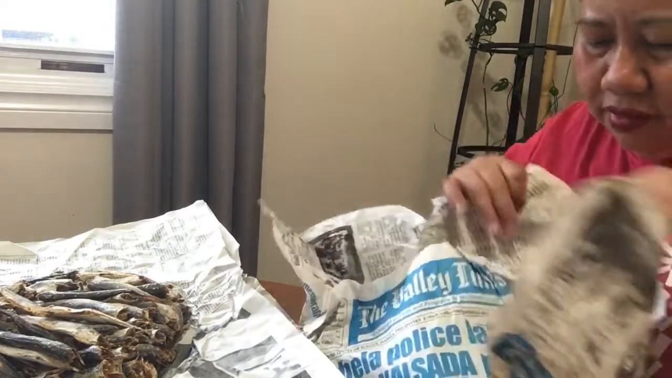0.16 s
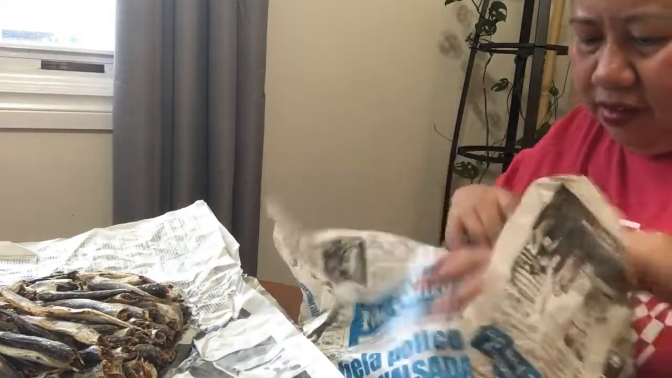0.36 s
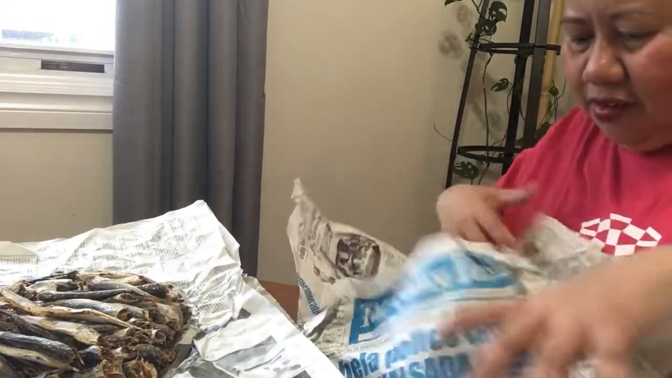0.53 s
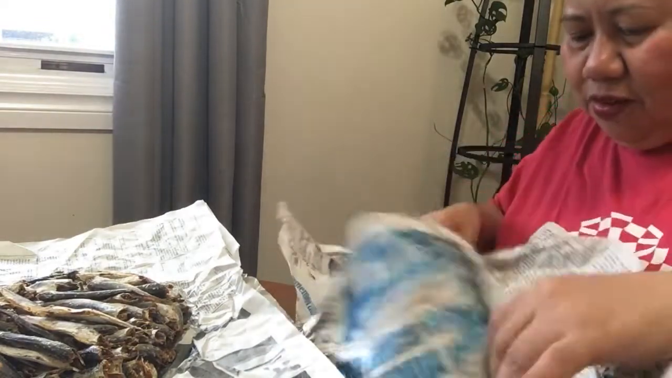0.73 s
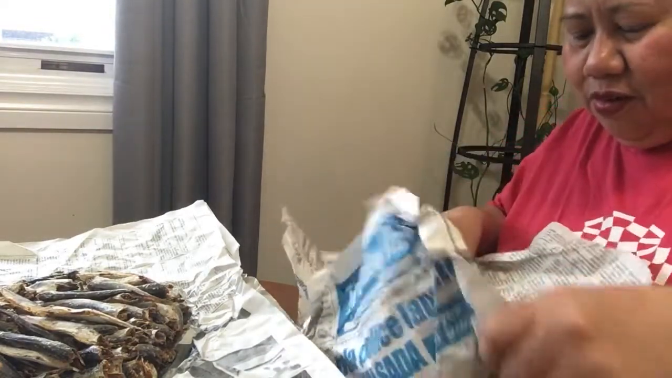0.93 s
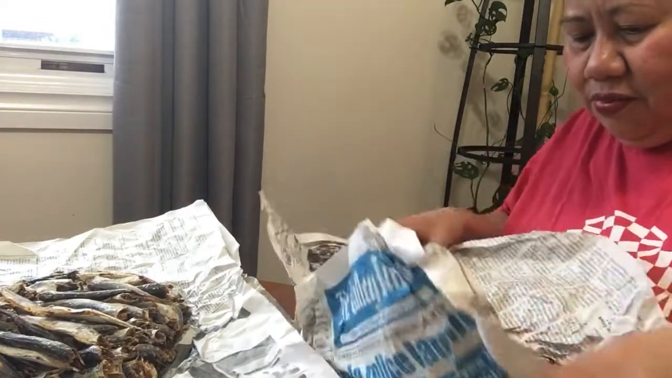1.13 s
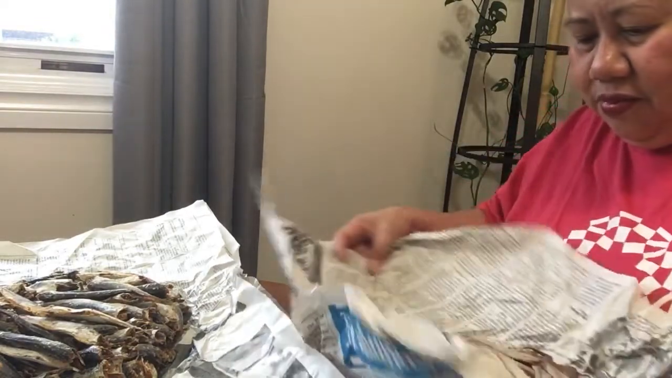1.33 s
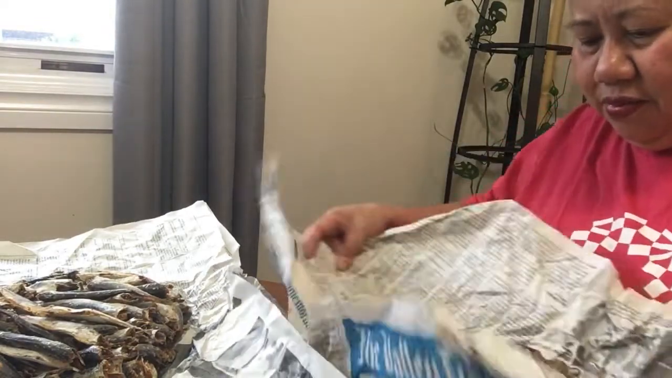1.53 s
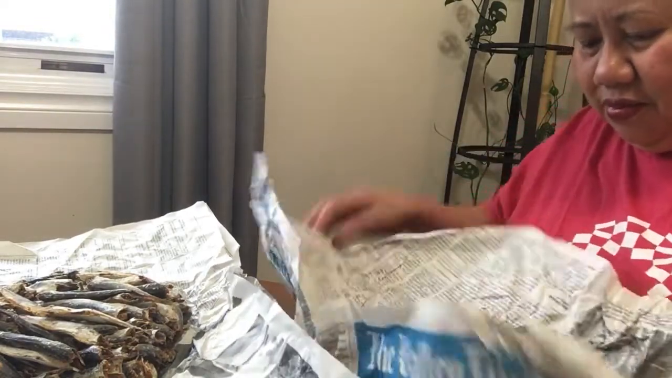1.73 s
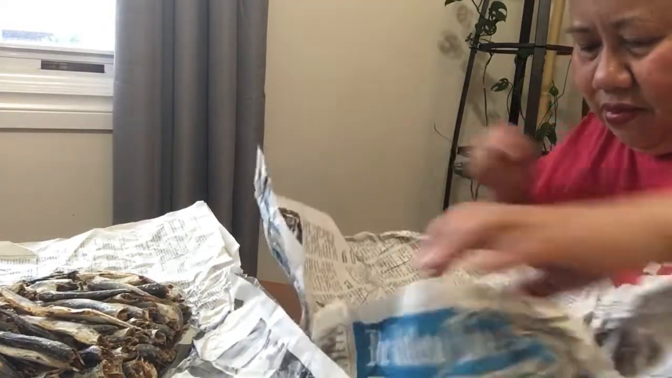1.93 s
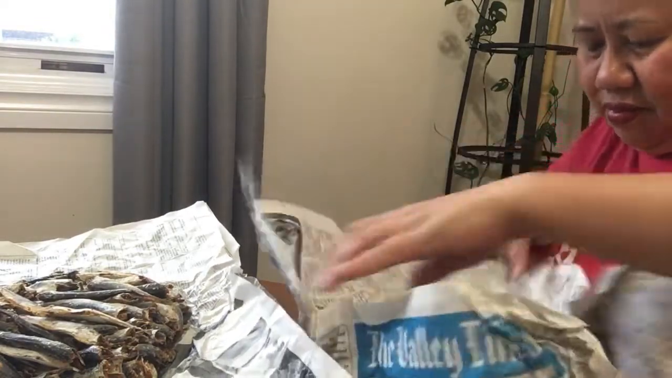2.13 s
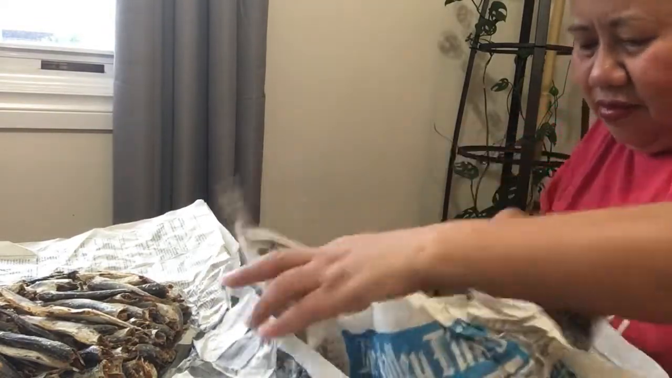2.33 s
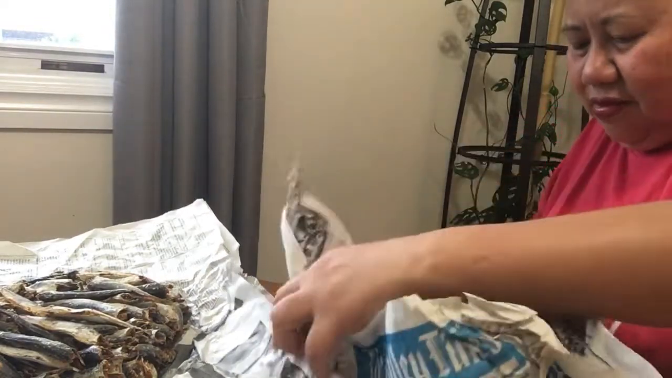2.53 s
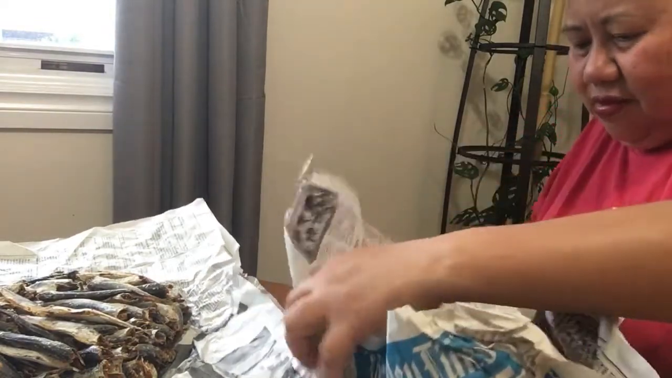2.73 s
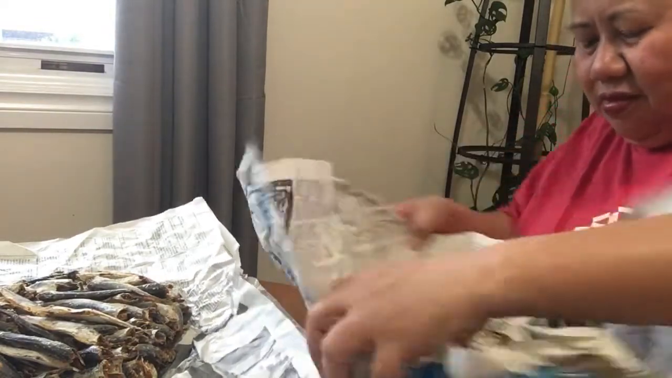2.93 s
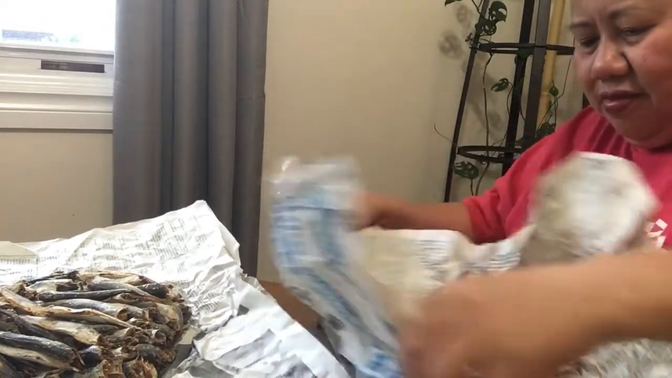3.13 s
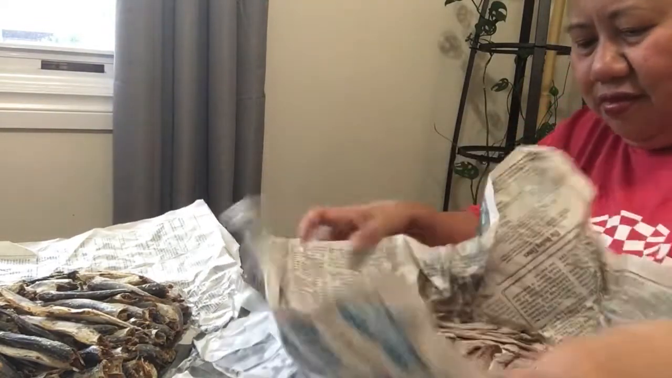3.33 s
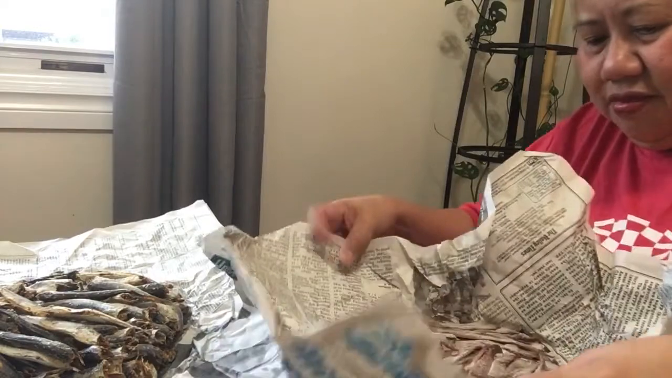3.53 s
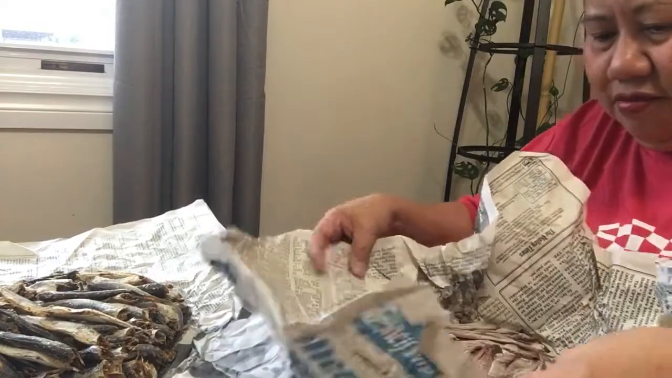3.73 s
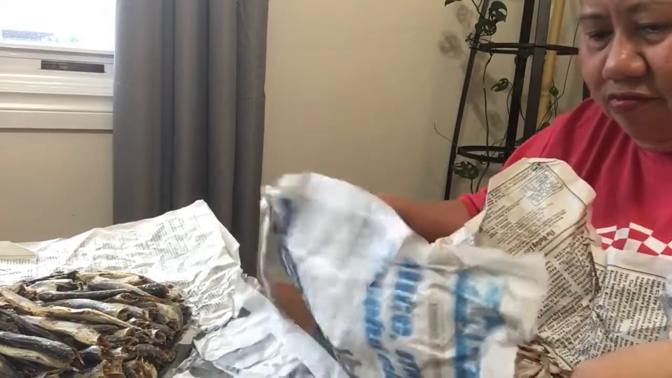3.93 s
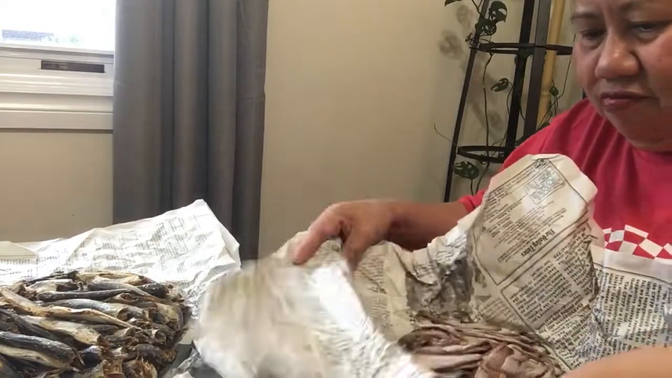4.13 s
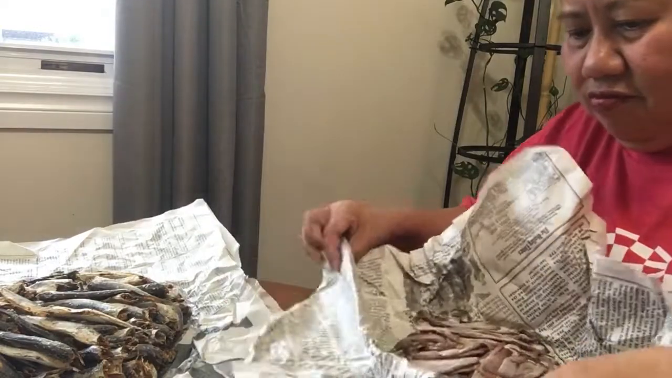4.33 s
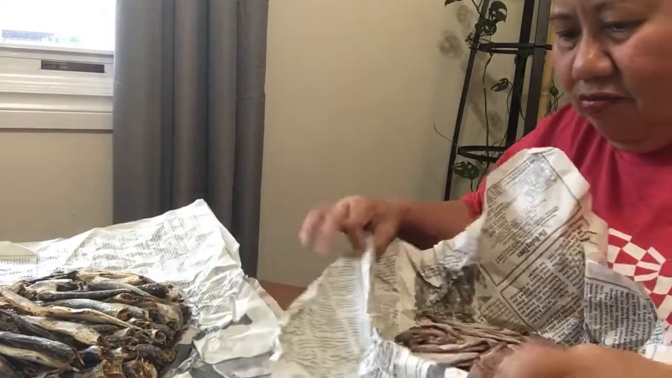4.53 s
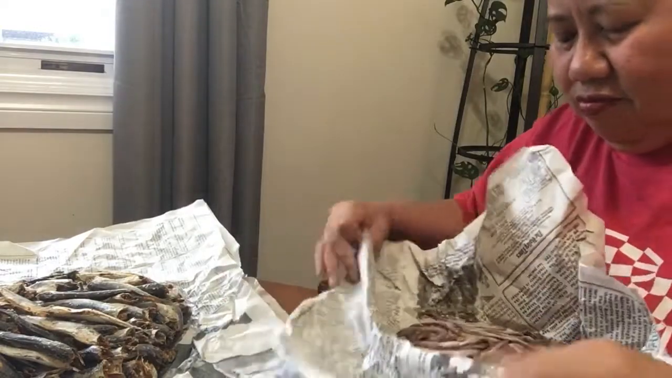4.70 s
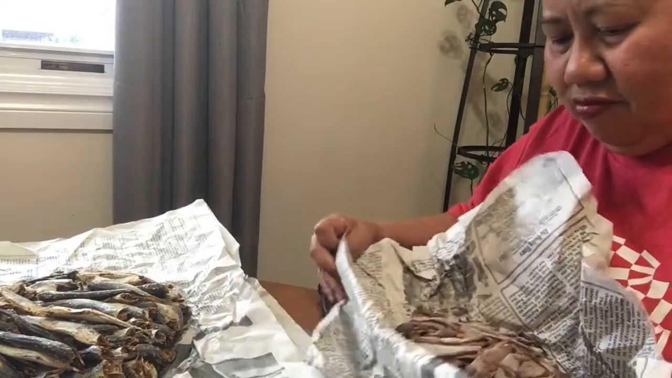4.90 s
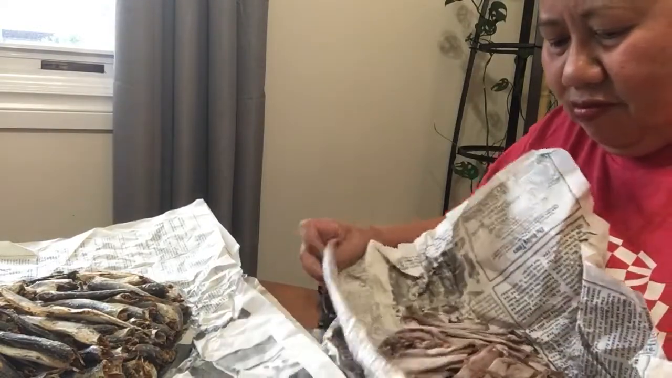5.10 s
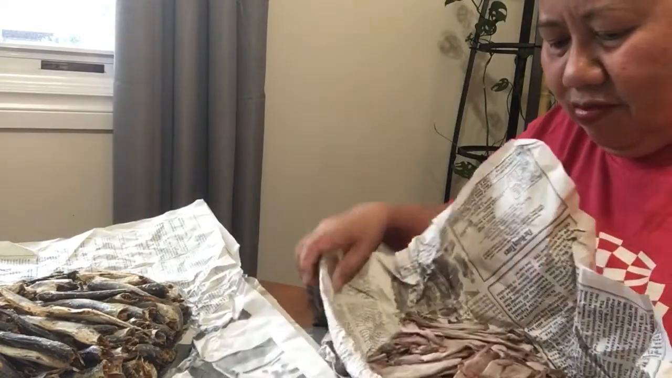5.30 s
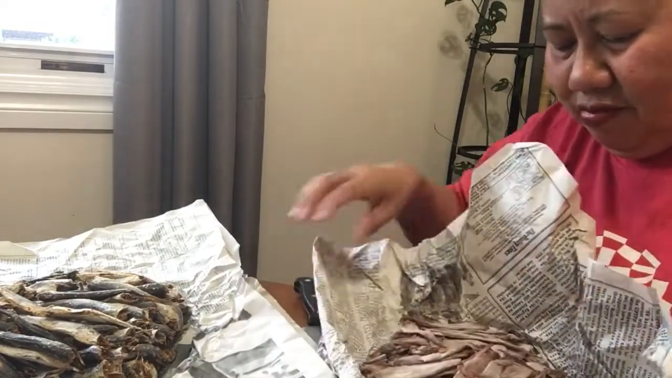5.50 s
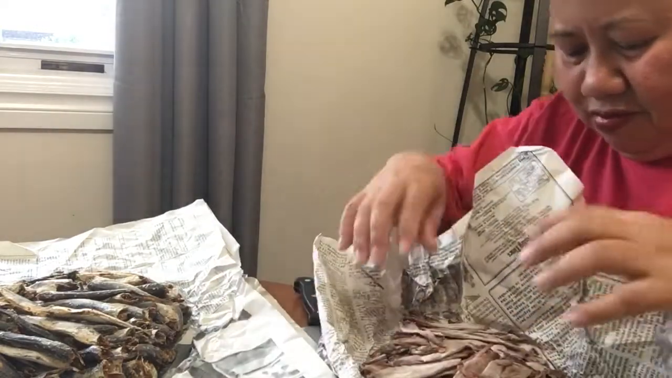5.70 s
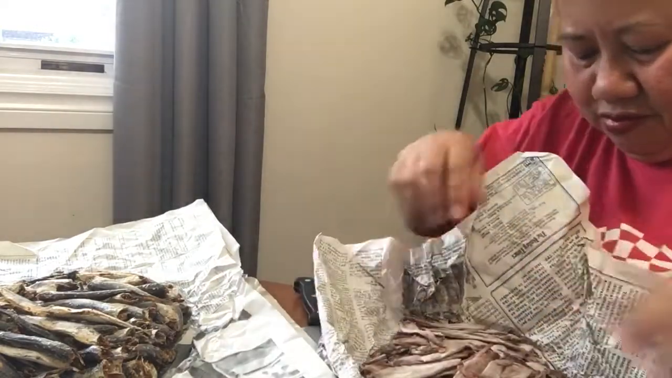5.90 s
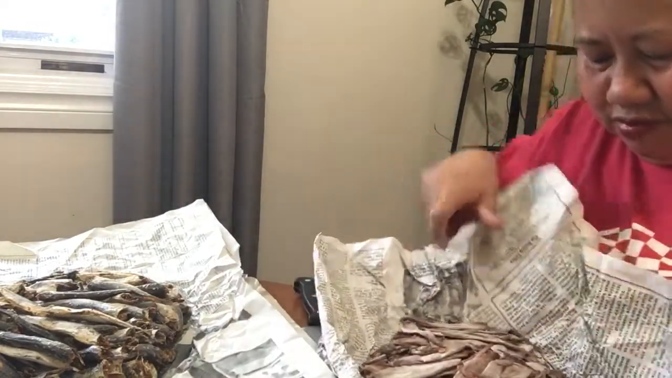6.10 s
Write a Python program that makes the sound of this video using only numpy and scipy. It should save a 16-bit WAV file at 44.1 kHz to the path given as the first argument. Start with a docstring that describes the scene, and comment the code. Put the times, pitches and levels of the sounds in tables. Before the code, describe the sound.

Dry newspaper crackles, snaps and flaps as hands unfold a bundle indoors, then a small hard object drops and rattles on a wooden table.

```python
"""Paper crackles and slides softly, and sharp creases snap one by one as hands unfold a newspaper bundle.
Crackle is many tiny ringing grains over hissing noise; each snap is a short ring with bursts of noise.
Large panels flap and pop low: deep lumpy noise and short dying waves, over faint room noise and a hum.
Near the end a small hard object drops on the wooden table and bounces: dying tones, ticks and a rattle.
A small quiet room adds a short echo to the snaps and bounces."""
import sys
import numpy as np
from scipy import signal
from scipy.fft import rfft, irfft
from scipy.io import wavfile
from scipy.ndimage import uniform_filter1d

SR = 44100
rng = np.random.default_rng(int(sys.argv[2]) if len(sys.argv) > 2 else 0)


def store_pcm(level_fs):
    """Save levels as 16-bit WAV."""
    pcm = np.round(np.clip(level_fs, -1, 1) * 32767).astype(np.int16)
    wavfile.write(sys.argv[1], SR, np.atleast_2d(pcm).T)


N = 271215

# How strongly the hands work the paper: start_s, level_db (of the rustle)
HANDLING = [(0, -47), (.2, -55.5), (.4, -41.5), (.49, -47.5), (.66, -37.5), (.88, -39), (.97, -45.5),
            (1.05, -41), (1.12, -45.5), (1.27, -34), (1.44, -37), (1.68, -39.5), (1.78, -48.5),
            (1.84, -42.5), (1.97, -49), (2.15, -45), (2.25, -38.5), (2.33, -35), (2.41, -38), (2.54, -39.5),
            (2.87, -31.5), (3.03, -38.5), (3.35, -43), (3.53, -53.5), (3.68, -55), (3.76, -45.5),
            (3.92, -38), (4.02, -41), (4.15, -35), (4.23, -40), (4.31, -33.5), (4.39, -37.5), (4.48, -34),
            (4.63, -43), (4.87, -31), (5.1, -35.5), (5.19, -35), (5.4, -51), (5.53, -60.5), (5.67, -63.5),
            (5.75, -61), (5.84, -70), (6.0, -59.5), (6.08, -59.5), (6.15, -48.5)]


def gain_of(db):
    """Turn decibels into a multiplier."""
    return 10 ** (np.asarray(db) / 20)


def evened(x):
    """Scale a sound to an average (RMS) strength of 1."""
    return x / np.sqrt(np.mean(x ** 2) + 1e-20)


def read(points, hz):
    """Read a curve of values over pitch, with pitch spaced by ratio as the ear hears it."""
    f, value = np.transpose(points)
    return np.interp(np.log(hz + 1), np.log(f + 1), value)


def along(rows, index):
    """Draw one column of a table as a curve over time, with a value at every sample."""
    columns = np.transpose(rows)
    return np.interp(np.arange(N) / SR, columns[0], columns[index])


def add(mix, s, sound):
    """Add a sound to the mix at a time in seconds, cut off at the end."""
    part = mix[round(s * SR):][:len(sound)]
    part += sound[:len(part)]


def coloured(x, points):
    """Filter a sound to a given spectrum without any sound before its cause (minimum phase)."""
    level_db = np.maximum(read(points, np.fft.rfftfreq(8192, 1 / SR)), -100)
    # Folding the cepstrum (the spectrum of the log gain) puts all the response after time zero
    cepstrum = irfft(np.log(gain_of(level_db)))
    cepstrum[1:4096] *= 2
    cepstrum[4097:] = 0
    response = irfft(np.exp(rfft(cepstrum)))[:4096]
    return signal.oaconvolve(x, response)[:len(x)]


def band(x, lo_hz, hi_hz):
    """Keep mainly the part of a sound between two pitches."""
    edges_hz = [lo_hz, min(hi_hz, .45 * SR)]
    return signal.sosfilt(signal.butter(2, edges_hz, "bandpass", fs=SR, output="sos"), x)


def coloured_burst(x, lo_hz, hi_hz):
    """Filter a short puff of noise twice to one band and scale its peak to 1."""
    y = band(band(x, lo_hz, hi_hz), lo_hz, hi_hz)
    return y / abs(y).max()


def wander(rate_hz):
    """Make a slow random drift: noise smoothed twice, with an average strength of 1."""
    size = max(int(SR / rate_hz), 2)
    smooth = uniform_filter1d(rng.standard_normal(N), size)
    return evened(uniform_filter1d(smooth, size))


def wavelet(hz, cycles, t):
    """Make a short wave that swells over its first turn, then dies within a few cycles."""
    turns = hz * t
    swell = 1 - np.exp(-(.9 * turns) ** 2)
    return np.sin(2 * np.pi * turns) * swell * np.exp(-turns / cycles)


def air():
    """Make the steady noise of the quiet room and the wavering hum of a distant machine."""
    # Tone of the room noise: pitch_hz, level_db (per Hz, relative)
    air_spectrum = [(15, -19), (25, -17), (84, -2), (130, -6), (149, -10), (373, -13), (863, -27.5),
                    (2760, -39), (5430, -41), (7710, -30), (10400, -44), (14000, -42), (16000, -34)]
    # Hum tones: pitch_hz, width_hz, level_db (before the swell)
    hum_tones = [(74.3, 4.94, -68.5), (127.6, 6.28, -72)]
    # Slow rise and fall of the hum: start_s, change_db
    hum_swell = [(0, 4), (3.3, -3), (3.8, 7.5), (5.1, 13.5), (5.6, 6.5), (6.15, -10)]
    noise_db = -61.5
    out = gain_of(noise_db) * evened(coloured(rng.standard_normal(N), air_spectrum))
    swell_db = along(hum_swell, index=1)
    for hz, width_hz, db in hum_tones:
        turns = np.cumsum(hz + width_hz / 2 * wander(5.34)) / SR
        level = gain_of(db + swell_db + 2.6 * wander(10))
        out += np.sqrt(2) * level * np.sin(2 * np.pi * turns)
    return out


def room(x):
    """Echo a sound with sparse taps of random sign, each pitch band dying at its own speed."""
    # Echo times: pitch_hz, t60_s (time to fall by 60 dB)
    echo_times = [(200, 0.58), (1500, 0.18), (5000, 0.14), (12000, 0.44)]
    taps = np.zeros(SR // 2)
    at = np.arange(200, len(taps) - 20, 20)
    taps[at + rng.integers(0, 20, len(at))] = rng.choice([-1., 1.], len(at))
    hz, t, z = signal.stft(taps, SR, nperseg=256)
    decay = gain_of(-60 * t / read(echo_times, hz)[:, None])
    tail = signal.istft(z * decay, SR, nperseg=256)[1]
    return signal.oaconvolve(x, tail / np.linalg.norm(tail))[:N]


def bending(index, resting_db):
    """Shape a panel layer over time: it follows the handling and swells at each bend."""
    # Large panels bending: peak_s (fullest bend), flap_db, push_db (low push of air), length_s
    bends = [(0.137, -52, -53, 0.14), (0.41, -48, -49.5, 0.21), (.75, -42, -44, 0.18),
             (0.927, -40, -47, .09), (1.23, -65, -50.5, 0.18), (1.407, -40.5, -45, 0.026),
             (1.462, -57, -47, .06), (1.607, -45.5, -48, 0.12), (1.86, -55.5, -52, 0.11),
             (2.13, -51.5, -55, 0.13), (2.32, -46.5, -61, 0.14), (2.41, -46, -53, .1),
             (2.72, -45, -49, 0.082), (3.177, -52, -60, 0.16), (3.59, -63, -63, .05),
             (3.723, -54, -59, .05), (3.874, -48.5, -62, 0.27), (3.974, -50, -46, 0.05),
             (4.113, -49.5, -57, 0.26), (4.477, -43.5, -59, 0.074), (4.698, -49, -65, 0.043),
             (4.85, -49, -65, 0.063), (4.978, -39.5, -49, .1), (5.061, -38, -59, 0.036),
             (6.031, -58, -50, 0.06), (6.15, -48, -58, 0.028)]
    rise_db, fall_db = 21, 17.5  # lost one length before and after the fullest bend
    t = np.arange(N) / SR
    power = gain_of(along(HANDLING, index=1) + resting_db) ** 2
    for row in bends:
        lengths_away = (t - row[0]) / max(row[-1], .01)
        loss_db = np.maximum(fall_db * lengths_away, -rise_db * lengths_away)
        power = power + gain_of(row[index] - loss_db) ** 2
    return np.sqrt(power)


def panels():
    """Bend large sheets that push air: lumpy low noise, and a pop where a panel flips over."""
    # Tone of the flapping: pitch_hz, level_db (per Hz, relative)
    flap_spectrum = [(76, -38.5), (130, 1), (205, -3.5), (410, 2), (452, -2), (567, -1.5), (772, -8),
                     (900, -42), (1170, -5), (1980, -120)]
    # Panels flipping over: start_s, level_db (before the wave's own swell and decay), pitch_hz
    flips = [(0.218, -41, 122), (0.548, -37, 118), (0.754, -25, 497), (0.909, -25, 420), (1.145, -51, 119),
             (1.187, -31, 516), (1.39, -35, 170), (1.857, -39.5, 245), (1.918, -48, 123), (1.981, -61, 186),
             (2.052, -38, 158), (2.129, -45, 375), (2.289, -34, 385), (2.546, -34, 420), (2.922, -33, 384),
             (3.585, -37, 344), (3.666, -42, 540), (3.715, -34, 383), (3.859, -34, 299), (3.956, -32, 247),
             (4.196, -30.5, 420), (4.47, -28, 680), (4.684, -43, 331), (4.736, -34, 503)]
    flap_db, push_db = -15, -23  # between bends, relative to the rustle
    lumps = rng.standard_normal((2, N)) * gain_of(2.9 * wander(55))
    flap = evened(coloured(lumps[0], flap_spectrum))
    push = evened(band(band(lumps[1], 45, 165), 45, 165))
    out = bending(index=1, resting_db=flap_db) * flap
    out += bending(index=2, resting_db=push_db) * push
    t = np.arange(4000) / SR
    for s, db, hz in flips:
        add(out, s, gain_of(db) * wavelet(hz, 1.93, t))
    return out


def landings():
    """List the landings (start_s, object_db, table_db): each flight is a fixed share of the last."""
    first_s, first_flight_s, flight_share, bounce_count = 5.223, .095, .7, 7
    rows, s = [(first_s, -40, -25)], first_s  # it first lands flat, with a thud
    for k in range(bounce_count):
        flight_s = first_flight_s * flight_share ** k
        s += flight_s
        object_db = -19.5 - 5 * k
        table_db = -35 - 4 * k
        rows.append((s, object_db, table_db))
        # The object's far end lands a little later and softer
        rows.append((s + .15 * flight_s, object_db - 9, table_db - 5))
    return rows


def ringing(modes, t, swell_turns):
    """Sum dying tones that each need some turns to build up, so the bass speaks late."""
    out = np.zeros(len(t))
    for hz, db, t60_s in modes:
        swell = 1 - np.exp(-(hz * t / swell_turns) ** 2)
        out += gain_of(db - 60 * t / t60_s) * swell * np.sin(2 * np.pi * hz * t)
    return out


def bounces():
    """Land the object again and again: each blow ticks, rings the object and rattles the table top."""
    # Tones of the object, then of the table: pitch_hz, level_db (relative to the blow), t60_s
    object_modes = [(1270, -1.5, 0.018), (1573, -4.5, 0.048), (1620, -21, 0.08), (2030, -9, 0.027),
                    (2690, -7.5, 0.038), (2860, -18, 0.094), (3700, -9.5, 0.023)]
    table_modes = [(85, -12, .3), (221, -4, .12), (270, -7, .09), (323, -3, .12), (420, -5, .09),
                   (490, -7, .09), (554, -1, .13), (640, -5, .09), (760, -7, .07), (900, 4, .035),
                   (991, -6, .06)]
    out, t = np.zeros(N), np.arange(SR // 2) / SR
    short_t = t[:3000]
    object_ring = ringing(object_modes, t, 1.0)
    table_ring = ringing(table_modes, t, 1.8)
    blows = landings()
    noise = rng.standard_normal((len(blows), 2, 3000))
    for (s, object_db, table_db), (tick_noise, rattle_noise) in zip(blows, noise):
        tick = coloured_burst(tick_noise * np.exp(-short_t / 0.0021), 480, 5300)
        add(out, s, gain_of(object_db - 1) * tick)
        add(out, s, gain_of(object_db) * object_ring)
        rattle = .04 * rattle_noise * np.exp(-short_t / .016)
        rattle[0] = 1  # the blow itself
        add(out, s, gain_of(table_db) * signal.oaconvolve(table_ring, rattle))
    return out


def tilted(x):
    """Raise and lower the body and treble of the paper sound as the handling changes."""
    # Colour of the rustle: start_s, treble_db, body_db (against the plain paper sound)
    colour = [(0, 1, -1), (.2, -2.5, 2.5), (.45, 5, 0.5), (1.05, 2, -2.5), (1.6, -1, -0.5), (2.1, -1, 2),
              (2.9, 1, 0.5), (3.15, 3, -4), (3.6, -1, 0.5), (3.95, -2, 3.5), (4.3, 2, -1), (4.5, -2, -2),
              (5.0, -0.5, 1), (5.4, -2, 2), (6.15, 5, -4)]
    body, treble = band(x, 370, 1900), band(x, 4800, 15000)
    more_treble = gain_of(along(colour, index=1)) - 1
    more_body = gain_of(along(colour, index=2)) - 1
    return x + more_body * body + more_treble * treble


def rustle():
    """Crackle with tiny creases in clumps, each patch of sheet at its own pitch, over a sliding hiss."""
    # Tone of the paper: pitch_hz, level_db (per Hz, relative)
    paper_spectrum = [(350, -51), (600, -7.5), (779, -19), (894, -7.5), (1280, -4.5), (2180, -2.5),
                      (3250, -0.5), (4520, -2), (4910, -8), (6030, -7), (6640, -16), (8620, -18.5),
                      (10600, -35.5), (16000, -48)]
    clumps = gain_of(5.0 * wander(60))
    struck = rng.random(N) < 1500 * clumps / SR  # 1500 creases a second, times the clumping
    size = gain_of(0.79 * np.minimum(rng.exponential(1, N), 3.5)) * struck
    patch = rng.integers(0, 24, N)
    t, crackle = np.arange(600) / SR, np.zeros(N)
    for k, hz in enumerate(np.geomspace(700, 15000, 24)):
        grain = wavelet(hz, 2.6, t)
        grain = grain / np.linalg.norm(grain) * np.sqrt(hz)
        crackle += signal.oaconvolve(size * (patch == k), grain)[:N]
    hiss = rng.standard_normal(N) * gain_of(2.2 * wander(27))
    flat = evened(crackle) + gain_of(1.0) * evened(hiss)
    return gain_of(along(HANDLING, index=1)) * evened(coloured(tilted(flat), paper_spectrum))


def lesser_snaps():
    """Scatter smaller creases at chance moments, sized by the handling."""
    count = 110
    s = rng.random(count) * (N - 1) / SR
    size, pitch, treble, body = rng.standard_normal((count, 4)).T
    db = np.interp(s, *np.transpose(HANDLING)) + 9 + 3 * size
    hz = 3300 * 2 ** (.3 * pitch)  # spread in octaves
    treble_db = -9 + 4 * treble
    body_db = -15 + 4 * body
    return list(zip(s, db, hz, treble_db, body_db))


def snaps():
    """Buckle each crease in a few quick jerks that make the sheet ring briefly at its pitch."""
    # Clearest creases: start_s, level_db (peak of the ring), pitch_hz, treble_db, body_db (against it)
    clear_snaps = [(0.1276, -30, 1260, -9, -5), (0.1393, -36.5, 1220, -19, -9),
                   (0.1506, -29.5, 2940, -27, -24), (0.223, -35, 2440, -32, -5),
                   (0.3422, -24.5, 2700, -11, -11), (0.391, -24.5, 3630, -6, -14),
                   (0.4053, -27.5, 3560, -7, -5), (0.4548, -31, 2100, -10, -24),
                   (0.5511, -28, 3130, -14, -20), (0.563, -32, 3050, -7, -1.5),
                   (0.703, -22, 2860, -12, -19), (0.735, -18, 2660, -11, -16), (0.743, -20, 3810, -17, -15),
                   (0.7576, -21, 2510, -4, -4), (0.7744, -23, 3930, -10, -17), (0.784, -29, 4170, -1, -18),
                   (0.859, -35.5, 2450, 5, -3), (0.9362, -17, 3180, -9.5, -10),
                   (1.0181, -32, 3580, -9, -27), (1.2629, -22.5, 3700, -5, -34),
                   (1.277, -22, 4420, -23, -14), (1.3658, -20, 3800, -29, -20),
                   (1.3844, -30.5, 1320, -18, 2), (1.4335, -19.5, 3530, -4, -10),
                   (1.4701, -29, 2410, -25, -11), (1.483, -17, 2430, -22, -2.5),
                   (1.4952, -22, 3560, -29, -21), (1.549, -21.5, 3180, -7, -21),
                   (1.5876, -23, 2980, -6, -3), (1.6107, -20, 4240, -19, -8), (1.6307, -23, 3700, -2.5, -8),
                   (1.703, -27.5, 3060, -9, -11), (1.7713, -30.5, 2440, -23, -20),
                   (1.8231, -24, 4040, -26, -18), (1.8413, -17, 3940, -11.5, -13.5),
                   (2.0116, -25.5, 3950, -3, -17), (2.0343, -42, 1550, 4, -17),
                   (2.0854, -27.5, 1250, -11, -12), (2.0947, -23.5, 1700, -24, -16),
                   (2.1291, -16, 3100, -26, -13.5), (2.1613, -26, 2750, -26, -9),
                   (2.1775, -31, 4100, -18, -3), (2.2065, -23, 3560, -5, -20),
                   (2.2764, -25.5, 2860, -11, -20), (2.3483, -27, 3200, -17, -12),
                   (2.367, -31.5, 3350, -4, -19), (2.413, -20, 3150, -8, -13),
                   (2.4303, -16.5, 3060, -4, -20), (2.5679, -15.5, 4470, -16, -24),
                   (2.573, -26, 2020, -16, -13), (2.6298, -19, 2850, -33, -23),
                   (2.6928, -23, 3050, -17, -21), (2.7096, -29, 2360, -16, -17),
                   (2.8134, -15.5, 4300, -14, -19), (2.8419, -24, 3520, -15, -11),
                   (2.85, -20, 3350, -15, -20), (2.8826, -17.5, 3500, -6, -24),
                   (2.9946, -26, 2860, -2, -30), (3.0722, -17, 3100, -19, -36), (3.0818, -30, 3480, 1, -31),
                   (3.1046, -17, 3260, -8, -35), (3.114, -34, 3190, 7, -22), (3.1482, -26, 4600, -19, -17),
                   (3.17, -24, 3400, -7, -19), (3.244, -32, 3200, -13, -33), (3.2767, -31.5, 1370, -6, -1),
                   (3.3352, -26.5, 3070, -14, -6), (3.4521, -36, 3570, -16, -22),
                   (3.468, -25.5, 3600, -28, -12), (3.547, -41, 4230, -6, -27),
                   (3.5763, -38, 4360, -8, -20), (3.5881, -27.5, 3260, -14, -10),
                   (3.6601, -26, 2100, -3, -5.5), (3.6955, -26, 2140, -3, -6),
                   (3.7169, -22.5, 3160, -5.5, -18), (3.76, -25, 1900, -9, -8.5),
                   (3.7651, -22.5, 2770, -5, -16), (3.778, -26, 1960, -11, -21),
                   (3.7822, -29, 1760, -0.5, -14), (3.793, -23.5, 3600, -4, -12),
                   (3.8204, -21.5, 1810, -27, -11), (3.8462, -21.5, 2320, -9, -16),
                   (3.8572, -23.5, 2070, -6, -15), (3.8647, -19.5, 3350, -16, -8.5),
                   (3.8788, -18.5, 2300, -6, -1), (3.9196, -14, 3190, -8.5, -23),
                   (3.928, -28, 1480, 5, -19), (3.9816, -24, 3020, -19, -9),
                   (4.0066, -20.5, 2550, -22, -20), (4.046, -23.5, 4260, -12, -16),
                   (4.0531, -11.5, 2670, -17, -21), (4.064, -23, 3450, -21, -20),
                   (4.1127, -20.5, 1750, -6, -15), (4.1224, -15.5, 2630, -16, -12),
                   (4.163, -18, 2900, -5, -14), (4.223, -18.5, 2720, -13, -6),
                   (4.2299, -18.5, 4380, -16, -13), (4.2642, -24, 2980, -13, -21),
                   (4.2854, -28.5, 1680, -5, -16), (4.3031, -19, 3800, -15, -17),
                   (4.3154, -22, 2740, -19, -6), (4.3814, -20, 4400, -7, -34), (4.4238, -21, 3070, -23, -5),
                   (4.4534, -11.5, 4250, -29, -14), (4.4695, -15, 2960, -11, -5),
                   (4.4766, -16, 2900, -7, -16), (4.4877, -17, 2800, -0.5, -9),
                   (4.4999, -19, 3000, -16, -24), (4.576, -20.5, 1930, -6, -14),
                   (4.6428, -39, 3190, -13, -23), (4.652, -26, 3600, -5, -9.5),
                   (4.6887, -17.5, 2720, -4.5, -22), (4.7024, -20.5, 3070, -15, -7),
                   (4.7247, -10, 3120, -20, -34), (4.7389, -20.5, 3300, -8, -8),
                   (4.7949, -21, 3760, -25, -27), (4.8217, -25, 2320, -16, -14),
                   (4.866, -16.5, 3000, -8, -9), (4.8717, -20, 3060, -20, -10),
                   (4.884, -15, 3700, -16, -21), (4.908, -18, 2950, -25, -7.5),
                   (4.953, -16, 3170, -24, -17), (4.9667, -21, 4260, -13, -15),
                   (4.9839, -9.5, 2970, -27, -24), (5.0008, -16, 2630, -17, -16),
                   (5.0491, -13.5, 3700, -9, -18), (5.0584, -16.5, 2850, -19, -10),
                   (5.0858, -21, 2830, -22, -8), (5.0956, -22, 1960, -20, -7), (5.1326, -23, 4140, -12, -4),
                   (5.1517, -20.5, 4610, -1, -20), (5.195, -23, 2760, -7, -12),
                   (5.2122, -23, 2750, -18, -3), (5.225, -15.5, 3380, -31, -20),
                   (5.269, -30, 2760, -10, -8), (5.4191, -31, 1550, -19, -15), (5.5392, -37, 1310, -37, -7),
                   (5.5474, -32.5, 1310, -30, -17), (5.6056, -39.5, 3360, -30, -22),
                   (5.666, -27, 3440, -18, -13), (5.8656, -45, 2700, -23, -28),
                   (6.0048, -32.5, 2640, -22, -12), (6.0178, -34.5, 4440, -16, -14),
                   (6.1327, -34.5, 3680, -11, -7)]
    out, t = np.zeros(N), np.arange(900) / SR
    rows = clear_snaps + lesser_snaps()
    noise = rng.standard_normal((len(rows), 3, len(t)))
    rise = 1 - np.exp(-t / 0.0002)
    for (s, db, hz, treble_db, body_db), (a, b, c) in zip(rows, noise):
        jerks = .4 * a * (abs(b) > 2.1) * np.exp(-t / .002)  # rare, dying kicks
        jerks[0] = .7
        ring = np.convolve(jerks, wavelet(hz, 1.9, t))[:len(t)]
        spread = coloured_burst(c * rise * np.exp(-t / 0.0029), 1480, 5450)
        middle = ring / abs(ring).max() + 0.66 * spread
        puff = a * rise * np.exp(-t / 0.0012)
        fizz = .04 * coloured_burst(puff, 10000, 15500)
        treble = gain_of(treble_db) * (coloured_burst(puff, 3660, 8580) + fizz)
        body = gain_of(body_db) * coloured_burst(b * rise * np.exp(-t / 0.002), 822, 1840)
        add(out, s, gain_of(db) * (middle + treble + body))
    return out


def scene():
    """Mix all the layers; only the snaps and bounces get the room's echo."""
    near = snaps() + bounces()
    echo = gain_of(-7.5) * room(near)
    return (near + echo + rustle() + panels() + air())[None]


def record(dry):
    """Cut off the highest treble with a steep low-pass filter."""
    edge_hz = 15900
    low_pass = signal.firwin(511, edge_hz, window=("kaiser", 9), fs=SR)
    return signal.oaconvolve(dry, low_pass[None], "same")


dry = scene()
out = record(dry)
store_pcm(out)
```